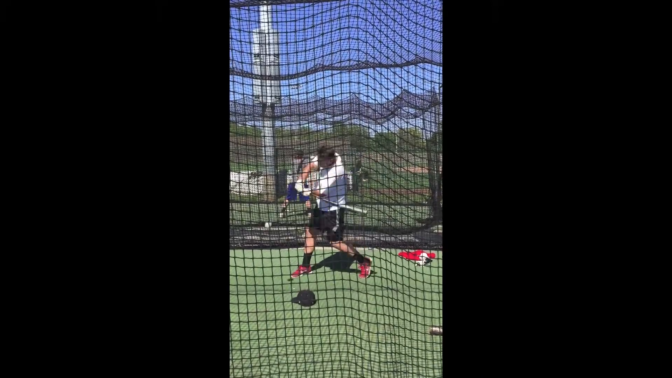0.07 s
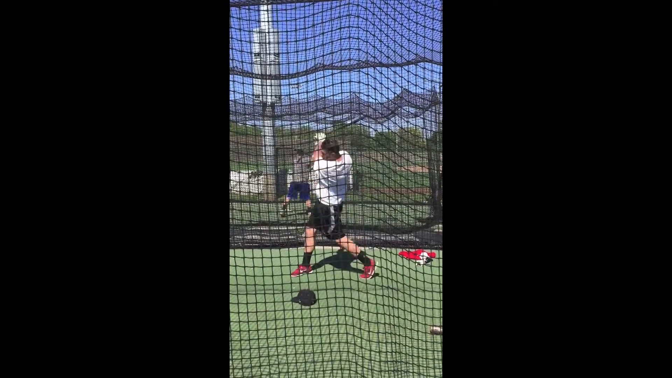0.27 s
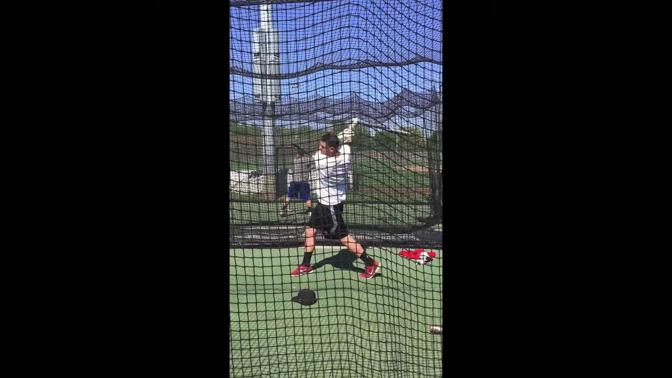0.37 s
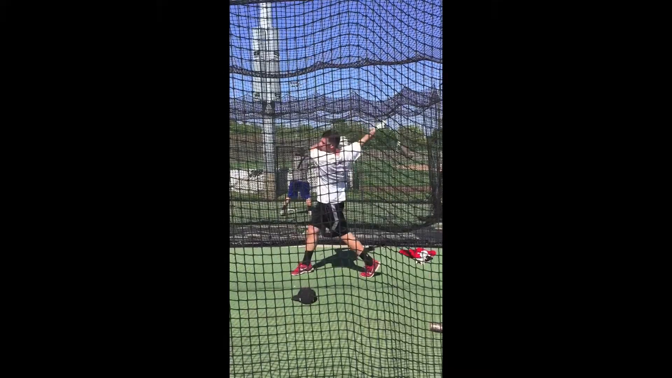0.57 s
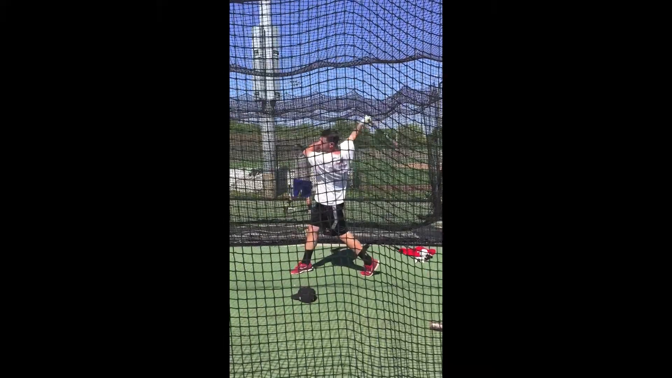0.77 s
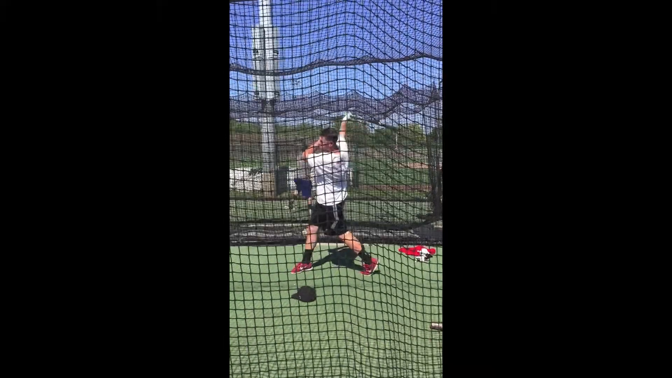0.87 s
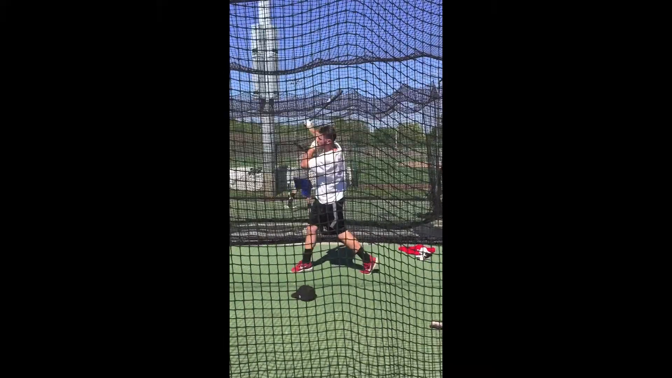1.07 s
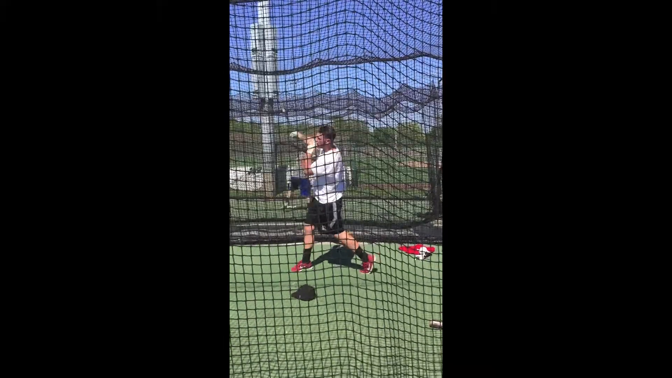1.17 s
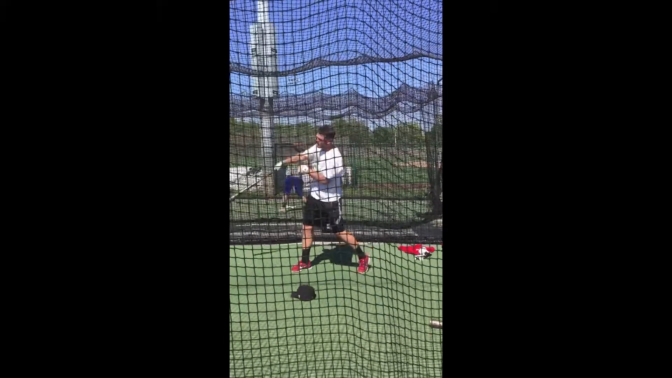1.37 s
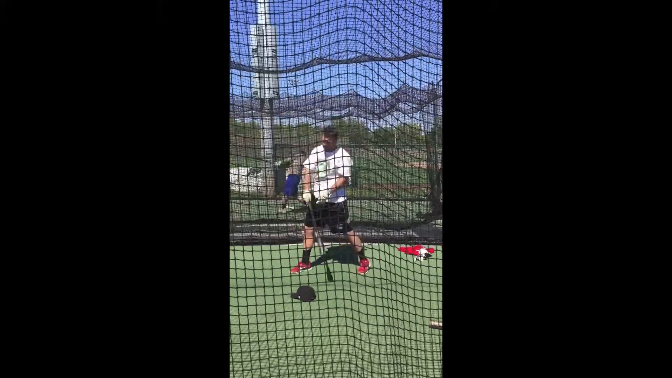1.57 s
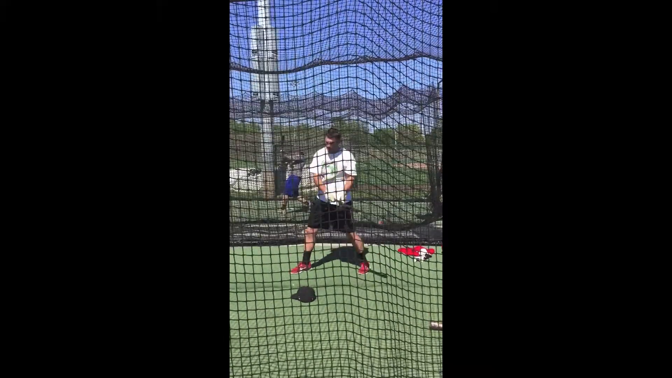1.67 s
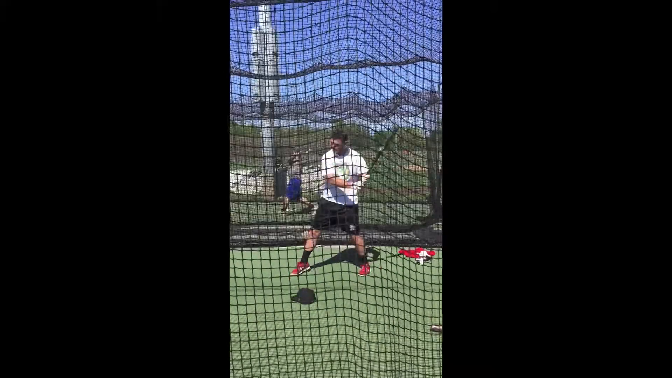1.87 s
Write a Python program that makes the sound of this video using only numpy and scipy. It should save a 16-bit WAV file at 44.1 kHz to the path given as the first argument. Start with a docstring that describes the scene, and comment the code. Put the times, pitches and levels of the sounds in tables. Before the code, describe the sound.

One sharp, ringing crack of a metal bat on a baseball is followed by soft net swishes and, later, a dull rattling knock. Behind it, a small engine chugs steadily under faint outdoor hiss.

```python
"""An outdoor netted batting cage. A metal bat cracks a ball: the ball squashes, the barrel rings, pings
on as it swings round, and the net swishes. Later a duller knock lands with a rattle and a short creak.
A small engine chugs throughout, each firing ringing its exhaust, with faint chirps far off and a bed
of outdoor hiss. Gain control ducks the scene after loud peaks."""
import sys
import numpy as np
from scipy import signal
from scipy.fft import rfft, irfft
from scipy.io import wavfile
from scipy.ndimage import uniform_filter1d

SR = 44100
rng = np.random.default_rng(int(sys.argv[2]) if len(sys.argv) > 2 else 0)


def to_wav(s):
    """Save 16-bit WAV."""
    ch = np.atleast_2d(s).T  # columns
    pcm = np.round(np.clip(ch, -1, 1) * 32767)  # PCM
    wavfile.write(sys.argv[1], SR, pcm.astype(np.int16))


N = 83790


def amp(db):
    """dB to gain."""
    return 10 ** (np.asarray(db) / 20)


def rms_one(x):
    """Scale to unit rms."""
    return x / np.sqrt(np.mean(x ** 2) + 1e-20)


def clock():
    """Time of each sample in seconds."""
    return np.arange(N) / SR


def butter(order, hz, kind="low"):
    """Butterworth filter sections."""
    return signal.butter(order, hz, kind, fs=SR, output="sos")


def drift(rate_hz):
    """Slow random wander, spread 1."""
    pole = np.exp(-80 * np.pi * rate_hz / SR)  # one step per 40 samples
    slow = signal.lfilter([1], [1, -2 * pole, pole * pole], rng.standard_normal(N // 40 + 2002))[2000:]
    return np.interp(np.arange(N) / 40, np.arange(len(slow)), rms_one(slow - slow.mean()))


def clicks(times_s, gains):
    """Impulses at given times."""
    out = np.full(N, 1e-18)
    np.add.at(out, np.clip((np.asarray(times_s) * SR).astype(int), 0, N - 1), gains)
    return out


def ring(x, hz, t60):
    """Resonator: a unit click starts a decaying sine of height 1."""
    r, w = amp(-60 / (max(t60, .001) * SR)), 2 * np.pi * hz / SR
    return signal.lfilter([0, np.sin(w)], [1, -2 * r * np.cos(w), r * r], x)


def coloured(points):
    """Unit-rms noise through an EQ curve of (freq_hz, gain_db) points."""
    hz, db = np.transpose(points)
    freqs = np.maximum(np.arange(N // 2 + 1) * SR / N, 1)
    eq = amp(np.interp(np.log(freqs), np.log(hz), db, left=-90))
    return rms_one(irfft(rfft(rng.standard_normal(N)) * eq, N))


def tone(rows):
    """A sine riding level and pitch curves, silent outside them."""
    s, db, hz = np.transpose(rows)
    t = clock()
    level_db = np.interp(t, np.r_[s[0] - .002, s, s[-1] + .01], np.r_[-110, db, -110])
    return np.sqrt(2) * amp(level_db) * np.sin(2 * np.pi * np.cumsum(np.interp(t, s, hz)) / SR)


# Metallic ring of the barrel: pitch_hz, gain_db, t60_s
BARREL_MODES = [(1777, -20, .05), (2055, -13, .035), (2478, -1.5, .046), (2935, -13, .06), (3130, -19, .04),
                (3765, -7, .035), (4135, -12, .04), (4375, -20, .04), (5200, -20, .03), (5950, -22, .025),
                (7220, -20, .015), (8660, -20, .012)]
# Tones of the squashed ball: pitch_hz, level_db
SQUASH_TONES = [(710, 0), (1150, 0.5), (1380, -8)]

def bat_hit(hit_s=.2025, contact_s=.004):
    """The ball sounds only while squashed; the blow adds a low thump and rings the barrel's modes."""
    blow, since = clicks([hit_s], amp(3)), clock() - hit_s
    contact = np.sin(np.pi * np.clip(since / contact_s, 0, 1)) ** .5
    squash = contact * sum(amp(db) * np.sin(2 * np.pi * hz * since) for hz, db in SQUASH_TONES)
    squash = signal.sosfilt(butter(3, 480, "high"), squash)
    thump = -amp(-15) * signal.sosfilt(butter(1, 300), ring(blow, hz=76, t60=.05))
    metal = sum((-1) ** k * amp(db) * ring(blow, hz, t60) for k, (hz, db, t60) in enumerate(BARREL_MODES))
    return squash + thump + metal


# Bright ping of the swinging barrel: time_s, level_db, pitch_hz
PING = [(.204, -17, 2735), (.212, -21, 2720), (.225, -28, 2820), (.230, -23, 2690), (.235, -12, 2702),
        (.25, -17, 2668), (.259, -18, 2660), (.264, -37, 2720), (.270, -30, 2730), (.279, -40, 2690)]
# Its long, faint upper ring: time_s, level_db, pitch_hz
UPPER_RING = [(.275, -45, 2930), (.295, -36, 2942), (.302, -45, 2850), (.31, -34, 2910), (.34, -50, 2910),
              (.35, -68, 2880), (.39, -49, 2920), (.45, -49.5, 2820), (.5, -66.5, 2880), (.575, -54, 2950),
              (.6, -65.5, 2876), (.69, -59, 2800), (.74, -55, 2960), (.86, -59.5, 2900)]
# The ping scattered back from around the cage: time_s, level_db, pitch_hz
CAGE_RETURNS = [(.29, -58, 2693), (.345, -40, 2540), (.37, -46, 2520), (.40, -50, 2677),
                (.435, -48.5, 2683), (.48, -58, 2664), (.53, -58, 2706), (.56, -66, 2685), (.68, -57, 2666),
                (.71, -75, 2640), (.76, -59, 2660), (.8, -55, 2660)]

def barrel_ping():
    """The barrel pings as it swings round, trailed by a fluttering upper ring and cage returns."""
    upper = tone(UPPER_RING) * (.65 + .7 * drift(70))
    returns = tone(CAGE_RETURNS) * (.4 + .8 * drift(65))
    return tone(PING) + upper + returns


# Noise layers, with the EQ slope on each side of the corner (negative rises away from it):
# start_s, level_db, attack_s, hold_s, t60_s, corner_hz, low_fall_db_per_octave, high_fall_db_per_octave
NOISE_BURSTS = [(-.01, -56, .01, .1, .2, 732, 30.5, 30.5), (0.177, -42, 0.0029, .02, .03, 2040, -4.5, 9.5),
                (0.2022, -9, 0.00019, 0.0011, 0.013, 4900, -3, 16),
                (0.103, -57, .005, 0.011, 0.045, 3850, 13, 23),
                (0.201, -29.5, .001, 0.031, 0.16, 2620, 3, 11),
                (0.297, -52.5, .01, 0.05, 0.069, 2960, -0.5, 11.5),
                (.305, -46.5, 0.0024, 0.0049, .04, 3500, 8, 22),
                (0.331, -42, 0.0071, .025, 0.083, 2360, 53, 29.5),
                (0.354, -55, 0.011, 0.11, 0.31, 3000, 10.5, 26.5),
                (0.421, -58, .003, 0.0073, 0.029, 4130, 13, 25),
                (0.454, -53.5, 0.0021, 0.012, 0.035, 2430, 3, 20),
                (0.508, -64, .003, 0.0087, 0.045, 3800, 12, 28),
                (0.697, -55, 0.0036, .012, 0.042, 2660, 11, 27),
                (0.337, -53, 0.004, 0.021, 0.063, 516, 11, 20),
                (0.599, -42, 0.0025, 0.0053, .1, 2220, 10, 14.5),
                (.61, -56, 0.0094, 0.018, 0.33, 6640, -0.5, 16),
                (0.747, -47, 0.00046, 0.0068, 0.15, 6000, -2.5, 14),
                (0.749, -56, .002, .06, 0.36, 6900, 36, 40),
                (0.748, -58.5, 0.0018, 0.047, 0.3, 8100, 38, 42),
                (0.757, -64.5, .01, 0.069, 0.25, 12500, 12, 5),
                (0.382, -60.5, 0.058, 0.28, 0.39, 480, 20.5, 30),
                (0.779, -54, 0.032, 0.072, 0.35, 3500, 0.5, 15),
                (1.101, -63, 0.00105, 0.0055, .06, 9390, 17, 31.5),
                (1.629, -23, .0004, 0.0034, 0.01, 3000, -3, 20),
                (1.633, -39, 0.0026, 0.028, .09, 2500, 4.5, 13),
                (1.684, -51.5, 0.011, 0.059, 0.48, 2700, 4, 15.5),
                (1.712, -39, 0.0013, 0.002, 0.021, 2980, 3, 22),
                (1.818, -55, 0.033, 0.021, .2, 3140, 4, 22)]

def cracks_and_swishes():
    """Swing, crack, scattered echoes, net swishes and a high tick: noise with attack, hold and decay."""
    out, t = np.zeros(N), clock()
    for start, db, attack, hold, t60, hz, low_fall, high_fall in NOISE_BURSTS:
        rise = np.clip((t - start) / attack, 0, 1)
        decay = amp(-60 * np.maximum(t - start - attack - hold, 0) / t60)
        eq = [(hz / 16, -4 * low_fall - 20), (hz / 4, -2 * low_fall), (hz, 0), (16 * hz, -4 * high_fall)]
        out += amp(db) * rise * decay * coloured(eq)
    return out


# The dull knock and its rattle: start_s, level_db, pitch_hz, t60_s
KNOCKS = [(1.627, -22.5, 1300, .006), (1.6287, -3, 1347, 0.0062), (1.6288, -10, 1800, .006),
          (1.6287, -13, 2990, 0.0071), (1.6293, -25, 484, 0.01), (1.63, -22, 1260, .012),
          (1.636, -21, 1440, .012), (1.640, -16, 1570, 0.0088), (1.649, -19.5, 1850, 0.0093),
          (1.649, -22, 2900, 0.0044), (1.6534, -29, 1700, 0.007), (1.655, -17, 1680, 0.01),
          (1.654, -22.5, 2750, 0.012), (1.661, -33, 1510, 0.0092), (1.662, -27, 2400, .004),
          (1.666, -24, 2640, .004), (1.6728, -29, 2040, .004), (1.685, -35, 2480, 0.0024),
          (1.698, -45, 2200, .004), (1.715, -30.5, 3070, 0.0091), (1.727, -43, 2630, 0.0057)]

def knock_and_rattle(tick_decay_s=.00095):
    """Each small impact is a brief ring with a tick of noise on the front."""
    rings = -sum(ring(clicks([s], amp(db)), hz, t60) for s, db, hz, t60 in KNOCKS)
    starts, levels_db = np.transpose(KNOCKS)[:2]
    impacts = clicks(starts, amp(levels_db))
    envelope = signal.lfilter([1], [1, -np.exp(-1 / (tick_decay_s * SR))], impacts)
    grit = coloured([(800, -18.5), (2000, 7), (5000, -2.5), (16000, -31)])
    return rings + amp(-10.5) * envelope * grit


# Strength of each slip in turn: gain_db
CREAK_SLIPS = [-36, -28, -34, -27.5, -30.5, -36]
# Body of the creak: pitch_hz, gain_db, t60_s
CREAK_MODES = [(1280, -7, 0.013), (1620, -1, 0.0083), (840, -23, 0.02)]

def creak(start_s=1.7397, gap_s=.0041):
    """Six quick slips ring three damped modes into one soft creak."""
    slips = clicks(start_s + gap_s * np.arange(len(CREAK_SLIPS)), amp(CREAK_SLIPS))
    slips = signal.sosfilt(butter(2, [700, 2400], "band"), slips)
    return sum(amp(db) * ring(slips, hz, t60) for hz, db, t60 in CREAK_MODES)


# Exhaust resonances: pitch_hz, gain_db, t60_s, polarity
EXHAUST_MODES = [(60, -17, 0.11, -1), (83, -7, 0.077, 1), (104.55, -3, 0.35, 1), (125, 0, 0.12, 1),
                 (160.8, -4.5, 0.093, 1), (214.7, -0.5, .2, -1), (230.5, -11.5, 0.38, -1),
                 (299.7, -8.5, 0.23, 1), (314.5, -16.5, 0.15, 1), (356, -14.5, 0.21, -1)]
# Fader rides below and above the crossover: time_s, boom_db, buzz_db
ENGINE_RIDES = [(0, -3, 1.7), (.2, -1.5, 2.4), (.3, -5, -1.7), (.5, -1, 1.4), (.9, 2.5, 0.32),
                (1.3, 0.5, 0), (1.6, 1, 0), (1.9, -1.5, -1)]
# EQ of the rumble: freq_hz, gain_db
RUMBLE_EQ = [(30, 6), (45, 7.5), (80, 16.5), (200, 10), (350, -2), (450, -47)]

def engine(firings=52, period_s=.04738, jitter_s=.00095, spread_db=1.5, puff_hz=330, crossover_hz=130):
    """A soft puff per firing rings the exhaust, each resonance a little differently, over a rumble."""
    firing_s = .01196 + period_s * np.arange(firings) + jitter_s * rng.standard_normal(firings)
    pre_roll = int(10 * period_s * SR)  # the exhaust is already ringing at the start
    shared_push = rng.standard_normal(firings)
    exhaust = 0
    for hz, db, t60, polarity in EXHAUST_MODES:
        push_db = spread_db * (.25 * shared_push + rng.standard_normal(firings))
        pulses = np.full(N + pre_roll + SR, 1e-18)
        pulses[(firing_s * SR).astype(int)] = polarity * amp(db + push_db)
        exhaust = exhaust + ring(pulses, hz, t60)
    exhaust = signal.sosfilt(butter(2, puff_hz), exhaust)[pre_roll:pre_roll + N]
    boom = signal.sosfiltfilt(butter(2, crossover_hz), exhaust)
    buzz = exhaust - boom
    s, boom_db, buzz_db = np.transpose(ENGINE_RIDES)
    chug = amp(np.interp(clock(), s, boom_db)) * boom + amp(np.interp(clock(), s, buzz_db)) * buzz
    rumble = amp(-43 + 1.5 * drift(4)) * coloured(RUMBLE_EQ)
    return amp(-35) * rms_one(chug) + rumble


# Far-off chirps: start_s, length_s, level_db, from_hz, to_hz
CHIRPS = [(1.232, .05, -58, 3240, 3240), (1.3, .075, -59, 2900, 1800), (1.595, .03, -58, 3250, 3050),
          (1.185, .03, -61, 2750, 2750)]

def chirps():
    """Brief raspy whistles, flat or falling in pitch, that swell and fade."""
    out, t = np.zeros(N), clock()
    rasp = .8 + .45 * drift(150)
    for start, length, db, from_hz, to_hz in CHIRPS:
        progress = np.clip((t - start) / length, 0, 1)
        phase = 2 * np.pi * np.cumsum(from_hz + (to_hz - from_hz) * progress) / SR
        out += amp(db) * rasp * np.sin(np.pi * progress) * np.sin(phase)
    return out


def flicker(x, depth_db):
    """Each third-octave band wavers in level on its own."""
    freqs, spectrum = np.arange(N // 2 + 1) * SR / N, rfft(x)
    band = np.clip(3 * np.log2(np.maximum(freqs, 1) / 350), 0, 13).astype(int)
    return sum(amp(depth_db * drift(7)) * irfft(spectrum * (band == k), N) for k in range(14))


# EQ of the outdoor hiss: freq_hz, gain_db
AIR_EQ = [(240, -27), (400, 2), (520, -8), (740, 0.5), (1200, -3), (1440, -6), (1850, -5.5), (2100, -14.5),
          (2750, -7.5), (3100, -13), (4500, -19.5), (6500, -27), (9040, -31.5), (16000, -42)]
# Fader rides on that hiss: time_s, level_db, treble_boost_db
AIR_RIDES = [(0, -56, 1.5), (.17, -58, 5), (.3, -60, -4), (.55, -57, -0.5), (.9, -54, 3), (1.05, -57, -4),
             (1.3, -57.5, -4.5), (1.55, -57, -4), (1.9, -62.5, 0)]
# EQ of the microphone hiss: freq_hz, gain_db
MIC_HISS_EQ = [(3000, -12), (6000, 0), (9000, -5.5), (16000, -13)]

def air(treble_hz=2600, whine_hz=1700, whine_width_hz=30):
    """Outdoor hiss whose treble comes and goes, steady microphone hiss and a thin, wavering whine."""
    whine = rms_one(ring(rng.standard_normal(N), whine_hz, t60=2.2 / whine_width_hz))
    s, level_db, boost_db = np.transpose(AIR_RIDES)
    hiss = flicker(coloured(AIR_EQ), depth_db=2)
    treble = signal.sosfiltfilt(butter(2, treble_hz, "high"), hiss)
    hiss += (amp(np.interp(clock(), s, boost_db)) - 1) * treble
    hiss *= amp(np.interp(clock(), s, level_db) + 1.2 * drift(8))
    mic_hiss = amp(-79) * coloured(MIC_HISS_EQ)
    return hiss + mic_hiss + amp(-62.5 + 1.2 * drift(10)) * whine


def scene():
    """Action and background mixed to mono."""
    action = bat_hit() + barrel_ping() + cracks_and_swishes() + knock_and_rattle() + creak()
    return (action + chirps() + engine() + air())[None]


def record(dry):
    """Low cut, gain control that ducks after loud peaks and recovers, soft clipping, then a high cut."""
    threshold_db, squeeze, recover_db_per_s, ceiling = -12, .27, 8, .72
    dry = signal.sosfilt(butter(3, 38, "high"), dry)
    level_db = 20 * np.log10(uniform_filter1d(np.abs(dry), size=200) + 1e-9)
    cut_db = squeeze * np.maximum(level_db - threshold_db, 0)
    recovery_db = recover_db_per_s * clock()
    duck_db = np.maximum.accumulate(cut_db + recovery_db, axis=1) - recovery_db
    duck_db = signal.lfilter([.004], [1, -.996], duck_db)  # eases in over about 6 ms
    rounded = ceiling * np.tanh(dry * amp(-duck_db) / ceiling)
    return signal.sosfilt(signal.cheby2(12, 70, 17160, fs=SR, output="sos"), rounded)


dry = scene()
out = record(dry)
to_wav(out)
```